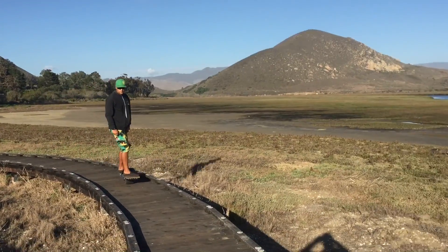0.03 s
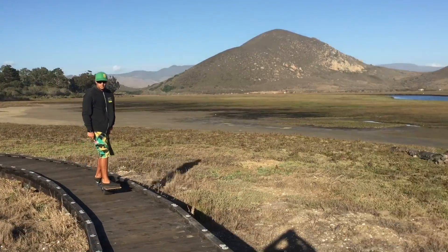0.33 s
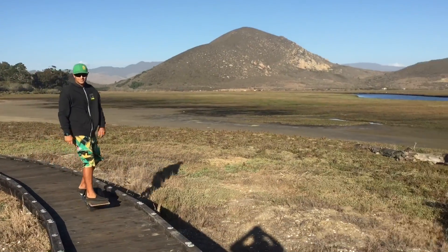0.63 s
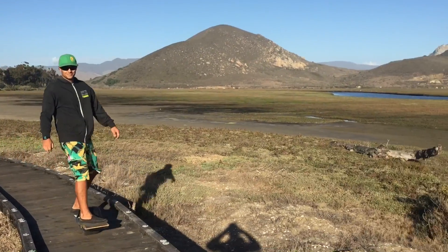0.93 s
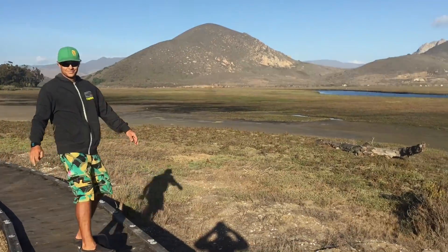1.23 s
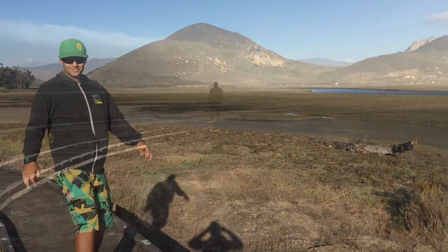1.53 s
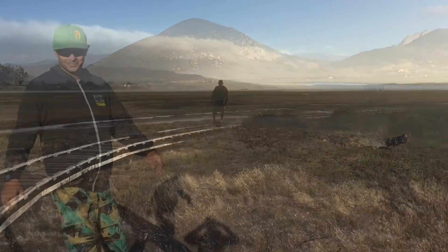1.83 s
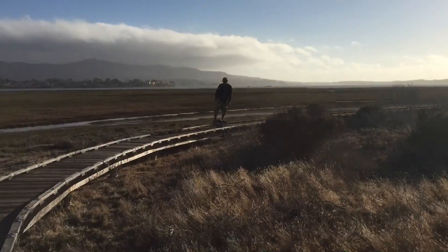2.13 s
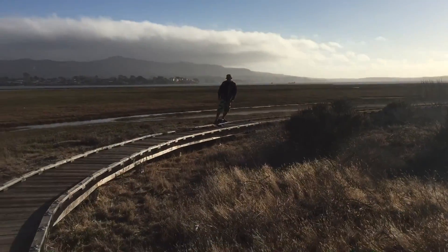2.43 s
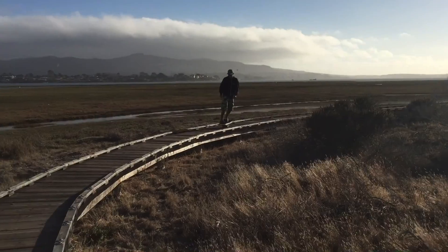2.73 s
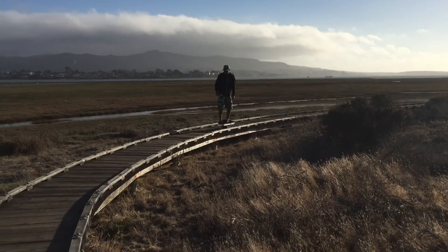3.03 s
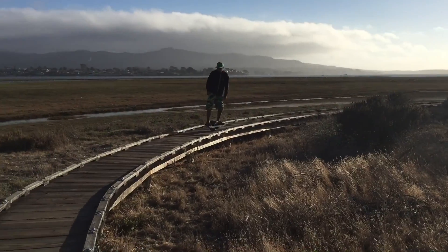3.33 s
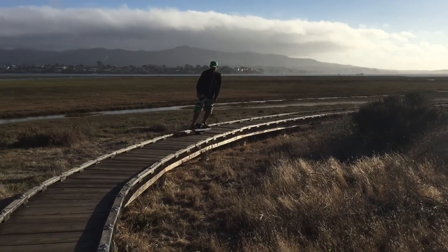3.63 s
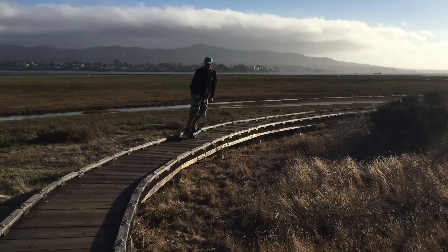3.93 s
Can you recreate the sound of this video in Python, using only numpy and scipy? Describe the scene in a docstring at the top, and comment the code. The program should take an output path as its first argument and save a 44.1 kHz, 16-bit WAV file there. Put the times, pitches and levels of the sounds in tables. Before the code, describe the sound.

A skateboard rolls over wooden planks outdoors, at first under a hollow, crackling rush of wind that stops abruptly at 0.8 seconds. The board passes close, grinding and ticking, with its sharpest clacks near 1.5 seconds, and fades by 2. From about 2.3 seconds it approaches again from farther off, with scattered clacks until 4. Wind rumbles and thuds on the microphone throughout, hardest around 1.5 and 2.5 seconds.

```python
"""Skateboard on a windy marsh boardwalk

One microphone in open marsh. A skateboard comes close, fades, then approaches again from far off;
its wheels grind on the grain, tick over the gaps and clack on raised planks. Wind buffets the
microphone throughout: at first a hollow, crackling flutter, then low thuds and rumble."""
import sys
import numpy as np
from scipy import signal
from scipy.fft import rfft, irfft
from scipy.io import wavfile

SR = 44100
rng = np.random.default_rng(int(sys.argv[2]) if len(sys.argv) > 2 else 0)


def wav_out(sig):
    """Save sig, one row per channel (or a flat mono array), as 16-bit PCM at SR to the path in sys.argv[1]."""
    wavfile.write(sys.argv[1], SR, np.round(np.clip(np.atleast_2d(sig).T, -1, 1) * 32767).astype(np.int16))


N = 176400
T = np.arange(N) / SR
GRAIN = 8192   # samples in one short sound

# level of the board on its close pass: t/s, level/dB
NEAR_PASS = [(0, -43), (.4, -47), (.785, -39.5), (.815, -39), (1.0, -38.5), (1.22, -38.5), (1.4, -44),
             (1.65, -42.5), (1.85, -49.5), (2.05, -61.5), (2.3, -74)]
# spectrum of the wind's thin crackles: f/Hz, level/dB
CRACKLE_SPECTRUM = [(2000, -1.5), (4600, 6.5), (5500, -1), (8000, -1), (11000, -10), (15500, -12)]


def from_db(db):
    return 10 ** (np.asarray(db) / 20)


def rms_one(x):
    return x / np.sqrt(np.mean(x ** 2) + 1e-20)


def bins_hz(size):
    return np.maximum(np.fft.rfftfreq(size, 1 / SR), 1)


def level(rows):
    """Gain over time from rows of t/s, level/dB."""
    return from_db(np.interp(T, *np.transpose(rows)))


def at_hz(rows):
    """Gain as a function of frequency from rows of f/Hz, level/dB."""
    hz, db = np.transpose(rows)
    return lambda f: from_db(np.interp(np.log(f), np.log(hz), db))


def roll_off(ratio, slope_db):
    """Flat below a ratio of one, then falling by slope_db an octave."""
    return 1 / np.sqrt(1 + from_db(2 * slope_db * np.log2(ratio)))


def colour(x, gain):
    """Minimum-phase filter with the given gain over frequency; the result has an RMS of one."""
    size = len(x)
    cepstrum = irfft(np.log(gain(bins_hz(size)) + 1e-6), size)
    cepstrum[1:size // 2] *= 2
    cepstrum[size // 2 + 1:] = 0
    return rms_one(irfft(rfft(x) * np.exp(rfft(cepstrum)), size))


def drift(hz):
    """Random wander, mostly slower than hz, with an RMS of one."""
    f = np.fft.rfftfreq(N, 1 / SR)
    return rms_one(irfft(rfft(rng.standard_normal(N)) / (1 + (f / hz) ** 2), N))


def add(out, start_s, sound):
    """Mix a short sound in."""
    i = int(start_s * SR)
    a, b = max(i, 0), min(i + len(sound), N)
    out[a:b] += sound[a - i:b - i]


def dying_power(impulses, decay_s):
    """Power envelope of impulses that each die away."""
    return signal.lfilter([1], [1, -np.exp(-2 / (decay_s * SR))], impulses ** 2 + 1e-18)


def snap(decay_s, gain):
    """A brief coloured burst that starts near level one."""
    burst = rng.standard_normal(GRAIN) * np.exp(-T[:GRAIN] / decay_s)
    return colour(burst, gain) * np.sqrt(decay_s * SR / 2 / GRAIN)


def hiss():
    """A faint, steady hiss behind everything."""
    # noise floor: f/Hz, level/dB
    spectrum = [(1000, 17.5), (5000, 7), (7500, 1), (10500, -1.5), (13000, -2), (15500, -1.5)]
    return from_db(-69.5) * colour(rng.standard_normal(N), at_hz(spectrum))


def eddies(rows, low_hz, slope_db, evenness):
    """Eddies at the microphone swell and die in a few cycles; evenness 1 is smooth, 0 ragged."""
    out = np.zeros(N)
    t, f = T[:GRAIN] - GRAIN / SR / 2, bins_hz(GRAIN)
    skew, skirt_hz = .19, 1500   # eddies rise faster than they die and have a faint rough top
    skirt_band = from_db(-39) * roll_off(f / skirt_hz, 24) * np.sqrt(SR / 2 / skirt_hz)
    for s, length_s, db, top_hz in rows:
        swell = np.exp(-2 * (t / length_s / (1 + skew * np.sign(t))) ** 2)
        band = roll_off(f / top_hz, slope_db) * roll_off(low_hz / f, 8.8)
        swirl = signal.hilbert(irfft(rfft(rng.standard_normal(GRAIN)) * band))
        swirl = swirl.real / np.abs(swirl) ** evenness
        top_cut = roll_off(f / top_hz, slope_db / 2) * roll_off(f / top_hz / 2, slope_db / 2)
        puff = rms_one(irfft(rfft(swell * swirl) * roll_off(low_hz / f / 2, 4.7) * top_cut))
        skirt = irfft(rfft(rms_one(swell ** 2 * rng.standard_normal(GRAIN))) * skirt_band)
        add(out, s + t[0], from_db(db) * (puff + skirt) * np.sqrt(np.mean(swell ** 2)))
    return out


def low_wind():
    """Wind right on the microphone: a lumpy rumble with thudding buffets on top."""
    # strength of the rumble: t/s, level/dB
    strength = [(0, -34.5), (.4, -31), (.78, -32.5), (.83, -26), (1.3, -26.5), (1.6, -23.5), (1.75, -33.5),
                (1.87, -36.5), (2.15, -32), (2.31, -38.5), (2.42, -27), (2.62, -29), (2.72, -39.5),
                (2.95, -36.5), (3.25, -28), (3.4, -32), (3.63, -38), (3.78, -32.5), (4.0, -40.5)]
    # spectrum of the rumble: f/Hz, level/dB
    spectrum = [(20, -28.5), (35, -17.5), (55, 1), (95, 1), (190, -2.5), (300, -6.5), (400, -14),
                (520, -26.5), (900, -42.5), (2000, -95)]
    # low buffets: t/s, length/s, level/dB, top f/Hz
    buffets = [(.815, 0.0066, -19.5, 300), (.88, 0.095, -34, 346), (.997, 0.008, -21.5, 392),
               (1.097, 0.0051, -20.5, 380), (1.26, 0.017, -22.5, 380), (1.338, 0.011, -20, 351),
               (1.377, 0.017, -17.5, 224), (1.442, 0.015, -16, 416), (1.46, 0.0065, -14.5, 325),
               (1.512, 0.014, -26.5, 320), (1.553, 0.02, -19, 520), (1.6, 0.045, -24.5, 448),
               (1.652, 0.03, -27, 490), (1.69, 0.023, -16.5, 560), (1.735, 0.037, -23.5, 408),
               (1.79, 0.018, -27.5, 383), (1.885, 0.0038, -20.5, 700), (2.046, 0.0059, -16.5, 132),
               (2.2, 0.016, -14.5, 333), (2.4, 0.019, -16, 438), (2.433, 0.011, -17.5, 370),
               (2.495, 0.0077, -15, 300), (2.516, 0.0057, -9.5, 452), (2.55, 0.022, -22, 410),
               (2.582, 0.027, -24.5, 290), (2.65, 0.017, -23.5, 247), (3.132, 0.0062, -25, 280),
               (3.235, 0.022, -31.5, 340), (3.28, 0.016, -18, 280), (3.335, 0.0076, -24, 366),
               (3.44, 0.0098, -16.5, 370), (3.46, 0.0079, -20, 303), (3.485, 0.023, -21, 375),
               (3.775, 0.0096, -24, 340), (3.85, 0.015, -19.5, 270)]
    lumps = from_db(4 * np.minimum(drift(hz=23.5), 1))
    rumble = level(strength) * colour(rng.standard_normal(N) * lumps, at_hz(spectrum))
    return rumble + eddies(buffets, low_hz=95, slope_db=27.5, evenness=1)


def hollow_wind():
    """Wind across the microphone port: a hollow, gritty rush that grows, then stops abruptly."""
    # mid-range tone of the rush: f/Hz, level/dB
    spectrum = [(200, -8.5), (430, -3), (650, 0), (1200, 0.5), (1550, -11.5), (2000, -14), (2500, -13),
                (3100, -29), (3700, -43), (4150, -39), (4600, -42), (5200, -46.5), (8500, -47),
                (13000, -55.5), (15000, -54)]
    end_s, fade_s, rise_db_per_s, sparks_per_s = .787, .037, 4, 170
    rush = colour(rng.standard_normal(N) * from_db(3 * drift(hz=75)), at_hz(spectrum))
    f = bins_hz(N)
    treble = irfft(rfft(rush) * roll_off(2250 / f, 30) * roll_off(f / 6300, 30), N)
    flicker = from_db(9 * np.minimum(drift(hz=35), 1))
    rush += treble * (flicker - 1)
    sparks = rng.random(N) < sparks_per_s / SR
    sizes = from_db(2 * np.clip(rng.standard_normal(N), -2, 2))
    bursts = np.sqrt(dying_power(sparks * sizes, decay_s=.0016)) * rng.standard_normal(N)
    grit = colour(bursts, at_hz(CRACKLE_SPECTRUM))
    blowing = np.clip((end_s - T) / fade_s + .5, 0, 1)
    rise = from_db(rise_db_per_s * (np.minimum(T, 1) - end_s / 2))
    return blowing * rise * (from_db(-34) * rush + from_db(-71) * grit)


def wind_flutter():
    """Ragged, hollow eddies at the microphone port, mostly at the start."""
    # flutters: t/s, length/s, level/dB, top f/Hz
    flutters = [(.045, 0.025, -30, 1290), (.087, 0.018, -26, 1500), (.138, 0.026, -30, 1420),
                (.211, 0.0086, -25.5, 1150), (.341, 0.014, -25.5, 1280), (.418, 0.02, -24, 1400),
                (.434, 0.0046, -13.5, 1300), (.451, 0.02, -18.5, 1330), (.482, 0.0039, -13.5, 1570),
                (.618, 0.023, -26, 1410), (1.69, 0.034, -38, 1500), (1.885, 0.0027, -40, 1400),
                (2.515, 0.0037, -33, 1270)]
    return eddies(flutters, low_hz=670, slope_db=33, evenness=.35)


def wind_crackles():
    """Single thin crackles of wind on the microphone."""
    # crackles: t/s, level/dB
    crackles = [(0.117, -51), (0.186, -46), (.336, -42.5), (0.423, -50), (0.481, -46), (.489, -36),
                (.568, -42), (0.591, -50), (.688, -51), (.715, -42.5), (0.781, -57), (0.958, -54),
                (1.066, -51), (1.44, -55), (1.703, -58), (3.875, -55)]
    out = np.zeros(N)
    for s, db in crackles:
        add(out, s, from_db(db) * snap(decay_s=.0016, gain=at_hz(CRACKLE_SPECTRUM)))
    return out


def grinding(gap_db):
    """Four wheels grind on the wood, rattle, and tick at each gap about gap_db over the grind."""
    # when each wheel meets a gap: lag/planks
    wheel_lags = [0, .21, .43, .68]
    planks_per_s, jitter_s, rattles_per_s = 16, .007, 180
    planks = np.arange(int(N / SR * planks_per_s) + 1)[:, None]
    timing, strength = rng.standard_normal((2, 80, 4))[:, :len(planks)]
    gap_s = (planks + np.array(wheel_lags)) / planks_per_s + jitter_s * timing
    gaps = np.zeros(N)
    gaps[(gap_s * SR).astype(int) % N] = from_db(gap_db + 4 * np.clip(strength, -2, 1.5))
    sizes = from_db(7 + 4 * np.clip(rng.standard_normal(N), -2, 2))
    rattles = (rng.random(N) < rattles_per_s / SR) * sizes
    power = 1 + dying_power(gaps, decay_s=.0028) + dying_power(rattles, decay_s=.0016)
    return np.sqrt(power) * rng.standard_normal(N)


def rolling(run, body, gap_db):
    """The grind rings in board and planks; a bounce off the planks sweeps the tone."""
    force = grinding(gap_db) * from_db(2.5 * drift(hz=13))   # some planks sound louder
    elapsed_s = np.maximum(T - run[0][0], 0)
    lag_s = .0028 * (1 + .432 * elapsed_s)   # the bounce lags more as the board nears
    bounce = .31 * np.interp(T - lag_s, T, force)
    return level(run) * colour(force + bounce, at_hz(body))


def wheel_tone():
    """A faint wavering tone in the roll sinks as the board passes the microphone."""
    # tone at passing_s: f/Hz, level/dB relative to the roll
    tones = [(785, -8)]
    passing_s, sag_oct_per_s, width_hz = 1.1, .8, 6.7
    octaves = -sag_oct_per_s * (T - passing_s)
    out = np.zeros(N)
    for hz, db in tones:
        phase = 2 * np.pi * np.cumsum(hz * 2 ** octaves) / SR
        out += from_db(db) * (drift(width_hz) * np.cos(phase) + drift(width_hz) * np.sin(phase))
    return level(NEAR_PASS) * out


def clacks():
    """A wheel strikes a raised plank; truck and deck ring for a moment."""
    # wheel strikes: t/s, level/dB, ring f/Hz
    strikes = [(.847, -27.5, 2100), (0.992, -26, 2000), (0.997, -24.5, 3200), (1.066, -29.5, 2000),
               (1.12, -28, 2480), (1.195, -32.5, 2300), (1.234, -31.5, 2700), (1.443, -19.5, 3280),
               (1.478, -21.5, 1560), (1.497, -36.5, 2990), (1.702, -42, 4800), (1.883, -36, 1500),
               (2.033, -31, 1620), (2.642, -33.5, 3000), (2.699, -31.5, 3200), (3.233, -29.5, 3030),
               (3.261, -34.5, 3400), (3.705, -40, 3100), (3.946, -32.5, 2830)]
    deck_hz, top_hz, width_oct = 1700, 3700, .3
    hump = lambda ratio: 1 / np.sqrt(1 + (np.log2(ratio) / width_oct) ** 4)
    deck = lambda f: from_db(-4.5) * hump(f / deck_hz)
    out = np.zeros(N)
    for s, db, hz in strikes:
        ring = lambda f: roll_off(f / top_hz, 40.5) * np.hypot(hump(f / hz), deck(f))
        add(out, s, from_db(db) * snap(decay_s=.0011, gain=ring))
    return out


def skateboard():
    """The board passes close, then approaches from far off, its wheels rasping on both runs."""
    # resonances of wheels, deck and planks, close by: f/Hz, level/dB
    near_body = [(200, -11), (480, -5.5), (650, 5), (850, 2.5), (1250, 3), (1700, -7.5), (2000, -5),
                 (2350, -11), (2900, -10), (3400, -11), (4100, -25.5), (4600, -37.5), (5300, -43),
                 (6000, -38.5), (7200, -54), (12000, -57.5)]
    # the same from a distance: f/Hz, level/dB
    far_body = [(200, 5), (480, -10), (650, 3), (900, -3.5), (1400, 0), (1700, -11.5), (2080, -15.5),
                (2450, -7.5), (2780, -15.5), (3200, -4.5), (3650, -11.5), (4300, -35), (5300, -38.5),
                (6500, -41), (11000, -49)]
    # the distant approach: t/s, level/dB
    far_run = [(1.5, -55), (1.9, -56.5), (2.13, -51.5), (2.4, -45.5), (2.75, -46.5), (3.0, -44.5),
               (3.27, -42), (3.47, -47.5), (3.7, -44), (3.85, -45.5), (4.0, -44.5)]
    # swells of the wheels' bright rasp: t/s, level/dB
    rasp_run = [(.78, -69), (.82, -51), (1.02, -45), (1.17, -48.5), (1.35, -51.5), (1.8, -76), (2.55, -62),
                (2.7, -52.5), (2.82, -49), (2.98, -78), (3.15, -62), (3.25, -48.5), (3.36, -57),
                (3.45, -63.5), (3.62, -61), (3.72, -55.5), (3.83, -56), (3.96, -53.5)]
    # spectrum of the rasp: f/Hz, level/dB
    rasp_spectrum = [(900, -15.5), (1950, 4.5), (2400, 6.5), (2800, 3.5), (3350, 7.5), (4150, -4.5),
                     (4600, -11), (5150, -9), (5700, -15), (6500, -25), (7400, -33.5), (12000, -41.5)]
    near = rolling(NEAR_PASS, near_body, gap_db=11.5)
    far = rolling(far_run, far_body, gap_db=3.5)
    rasp = rolling(rasp_run, rasp_spectrum, gap_db=15.5)
    return near + far + rasp + wheel_tone() + clacks()


def scene():
    """Board, wind and hiss at the microphone, in mono."""
    return (skateboard() + low_wind() + hollow_wind() + wind_flutter() + wind_crackles() + hiss())[None]


def record(dry):
    """The microphone sheds the deepest bass; the top is cut."""
    low_cut = signal.butter(2, 38, "high", fs=SR, output="sos")
    high_cut = signal.ellip(10, .1, 80, 15800, fs=SR, output="sos")
    return signal.sosfilt(high_cut, signal.sosfilt(low_cut, dry))


dry = scene()
out = record(dry)
wav_out(out)
```